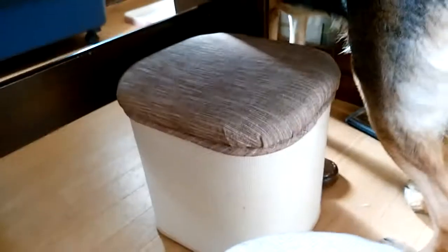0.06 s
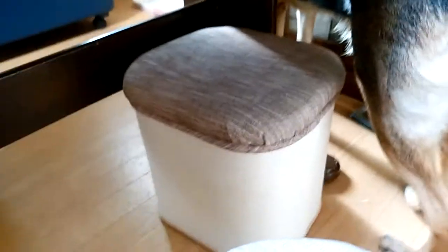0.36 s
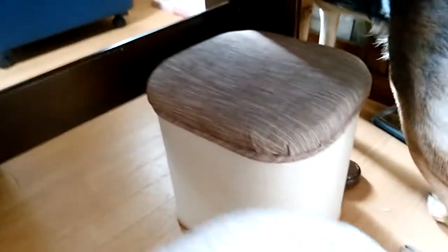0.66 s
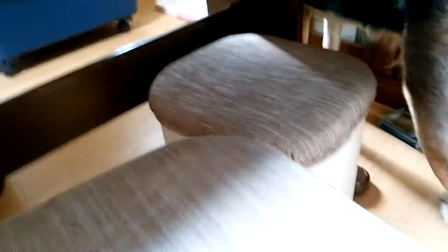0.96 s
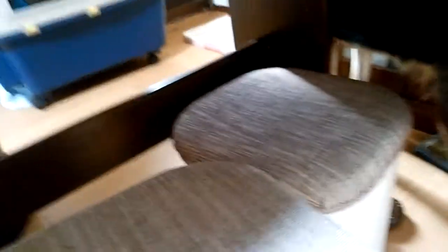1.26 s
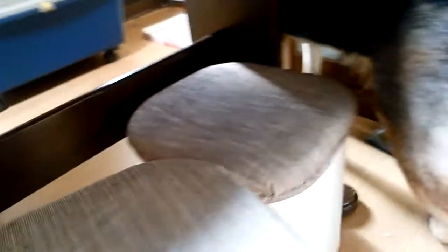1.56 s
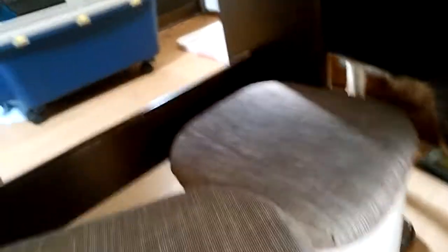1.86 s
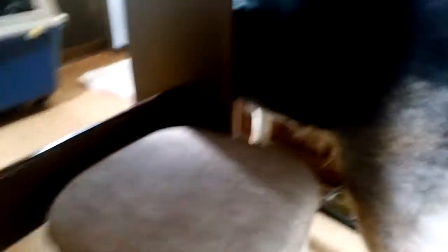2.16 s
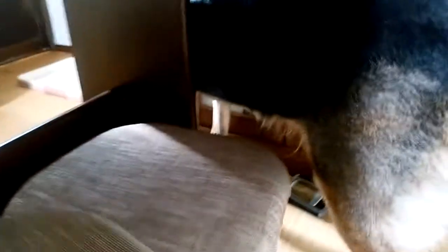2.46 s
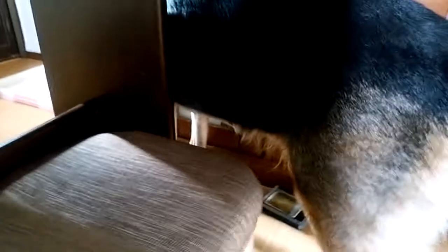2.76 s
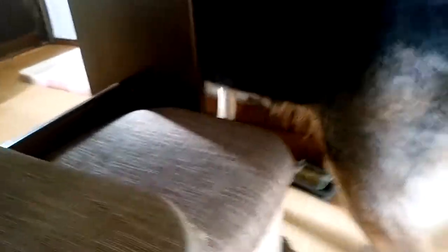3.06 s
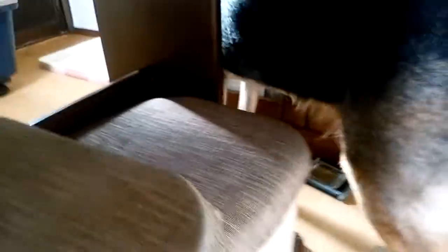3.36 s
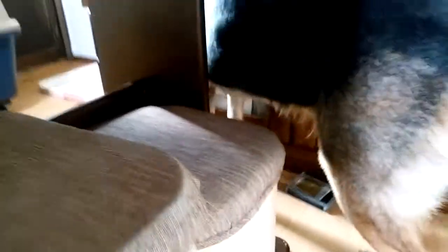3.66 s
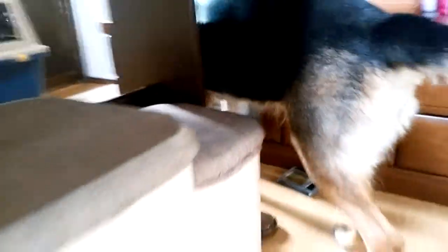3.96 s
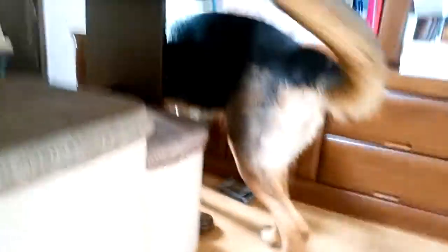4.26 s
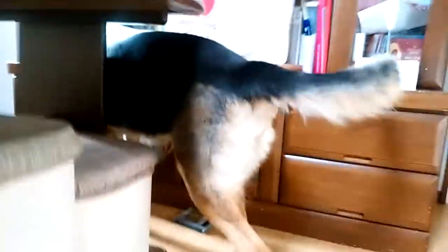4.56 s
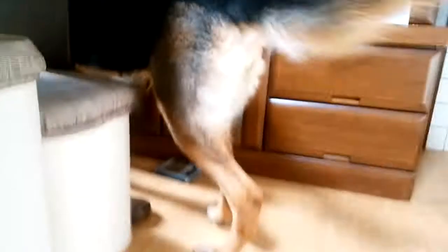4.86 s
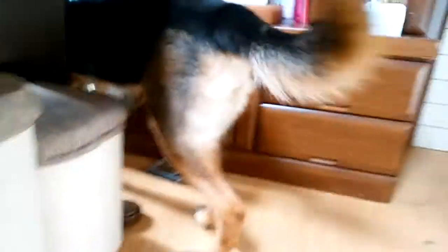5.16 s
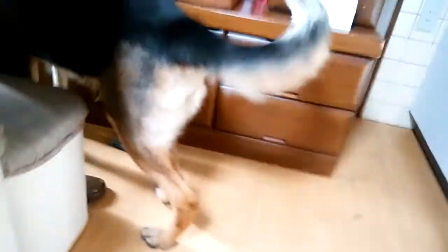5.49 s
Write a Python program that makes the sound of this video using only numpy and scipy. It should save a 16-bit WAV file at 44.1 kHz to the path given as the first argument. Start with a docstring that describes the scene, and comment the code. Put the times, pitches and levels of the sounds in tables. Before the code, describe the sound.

A large dog shifts about on a wooden floor in a small room, close to a hand-held microphone. Its claws click irregularly over soft paw thumps, short scuffs and the brushing of fur and fabric. The steps grow busier and heavier in the middle, with a few sharp ticks. Then the microphone takes a quick cluster of low bumps, and the movement thins to faint swishes and a last few clicks over quiet room air.

```python
"""A large dog shifts about on a wooden floor in a small room, close to a hand-held camera.
Its hard claws click in brief impacts, while its soft pads excite the low modes of the boards.
Sliding friction makes the paws scuff and, between steps, fur and fabric brush and swish.
Tiny ticks sound close by. The camera rumbles softly in the hand and is bumped a few times,
its case conducting the vibration to the microphone. Quiet air and a faint whine lie beneath."""
import sys
import numpy as np
from scipy import signal
from scipy.io import wavfile
from scipy.ndimage import uniform_filter1d

SR = 44100
rng = np.random.default_rng(int(sys.argv[2]) if len(sys.argv) > 2 else 0)


def materialize(psi):
    """Save the field psi as 16-bit PCM at rate SR to the path in sys.argv[1].

    A 1-D psi becomes a single channel; in a 2-D psi each row is a channel.
    """
    bounded = np.clip(np.atleast_2d(psi).T, -1, 1)
    quanta = np.round(bounded * 32767).astype(np.int16)
    wavfile.write(sys.argv[1], SR, quanta)


N = 252546
TIME = np.arange(N) / SR
BAND_LIMIT_HZ = 16200

# Reverberation of the room. Each row: frequency in Hz, 60 dB decay time in seconds.
ROOM_DECAY = [(100, 0.21), (500, 0.2), (2000, 0.34), (5000, 0.25), (9000, 0.32), (15000, 0.22)]
# Partials of the whine. Each row: frequency in Hz, rms level in dB.
WHINE_PARTIALS = [(6604, -89), (14716, -96)]
# Spectra of the noise sources. Each row: frequency in Hz, relative spectral density in dB.
AIR_SPECTRUM = [(25, -43), (65, 8), (200, -7), (600, -12), (1500, -18), (4000, -25), (7000, -27),
                (10000, -34), (16000, -35)]
RUMBLE_SPECTRUM = [(15, -61), (30, -22), (48, 5), (64, 3.5), (90, -5), (140, -12), (250, -24.5), (600, -61)]
RUB_SPECTRUM = [(70, -10.5), (150, -3), (260, 3.5), (550, -3.5), (900, -8), (1400, -14), (2500, -19.5),
                (5000, -49.5)]
HISS_SPECTRUM = [(700, -36), (1500, -2), (2800, 4), (4400, 0.5), (5500, 2.5), (6900, 4), (8200, -4),
                 (10000, -30), (14000, -71)]
FIZZ_SPECTRUM = [(6000, -40), (9000, -1.5), (11500, -4), (13500, 1), (15000, 3), (16500, -4.5)]
CLAW_SPECTRUM = [(100, 7), (280, 8), (600, 9), (1000, 4.5), (1600, 6), (2800, 1), (3700, -0.5), (4350, 1),
                 (5200, -4), (6800, -1.5), (8500, -13), (11000, -16), (15000, -9), (16500, -6)]
SWISH_SPECTRUM = [(150, -16), (350, 0.5), (650, 2.5), (1100, -8), (1700, -14), (3000, -17), (5000, -20),
                  (7000, -2.5), (8200, -12.5), (10000, -22.5), (15000, -30.5)]
# Shifts of the grip on the camera. Each row: start in seconds, length in seconds, level in dB.
GRIP_SHIFTS = [(0.723, 0.44, -39.5), (1.615, 0.12, -37.5), (2.138, 0.89, -44.5), (2.64, 0.2, -40),
               (3.012, 0.1, -41.5), (3.937, .35, -36), (4.375, 0.57, -45), (5.15, 0.59, -47)]
# Strokes of fur and fabric, one for each shift of the body.
# Each row: start, length and rise time in seconds, then relative levels of rub, hiss and fizz in dB.
BRUSH_STROKES = [(-.05, 0.041, .03, -52.5, -60.5, -68), (0.232, 0.79, 0.067, -56.5, -60.5, -71),
                 (0.712, .47, 0.025, -44, -56, -71), (1.429, 0.31, 0.25, -48.5, -51.5, -61),
                 (1.79, .19, .05, -59, -61, -74), (1.992, .13, 0.028, -49, -55, -69),
                 (2.325, 0.049, 0.039, -51, -51, -69), (2.39, 0.37, 0.16, -44, -66, -88),
                 (2.6, 0.17, 0.046, -39.5, -46.5, -65), (2.817, 0.084, .02, -43, -58, -79),
                 (2.905, 0.077, 0.097, -42.5, -49, -67), (3.028, 0.28, 0.05, -48, -47.5, -60),
                 (3.417, 0.093, .03, -49.5, -49.5, -52), (4.164, 0.062, .012, -50, -49.5, -67),
                 (4.38, 0.99, 0.048, -63.5, -70, -83), (5.39, 0.41, 0.13, -58, -60, -65.5)]
# Modes of the floor. Each row: frequency in Hz, relative level in dB, 60 dB decay time in seconds.
FLOOR_MODES = [(55.4, -24, 0.18), (65.7, 1, 0.18), (84.76, 0.5, 0.11), (109.2, -2.5, 0.1),
               (140.4, -3.5, 0.18), (160.3, -4, 0.081), (204, -4, 0.18), (250, -2.5, 0.15),
               (275, -23, 0.19), (324, -9.5, 0.11), (384.5, -10.5, 0.091), (472.5, -9.5, 0.084),
               (559.5, -11.5, 0.082), (677, -16, 0.04), (791, -23.5, 0.19)]
# Pad landings. Each row: start in seconds, relative peak in dB, upper-mode gain in dB, decay-time factor.
PAD_LANDINGS = [(.008, -40, 12, 3.3), (0.24, -43.5, 21, 0.66), (0.371, -28.5, 4, 1.7),
                (.388, -20.5, 5.5, 0.87), (0.773, -24, 11, 1.8), (.848, -19.5, -14, 1.3),
                (1.553, -24.5, -14, 0.98), (1.722, -26, -16, 2.4), (2.026, -17, -5, 0.68),
                (2.042, -16.5, -16.5, 2.4), (2.126, -18.5, -16.5, 1.36), (2.363, -30, 8, 0.16),
                (2.453, -26.5, -5, 0.29), (2.653, -7.5, -5, 0.92), (2.668, -14, 4, 1),
                (2.682, -12, 5, 0.81), (2.753, -16, -20, 1.55), (2.824, -15.5, 2.5, 1.2),
                (2.922, -22, -16, 0.87), (2.976, -17.5, -6.5, 1.54), (3.132, -31.5, 2, 1.1),
                (3.229, -28, 19, 0.32), (3.281, -16.5, 23.5, 0.5), (3.524, -18, 10.5, 1.04),
                (3.574, -34.5, -10, 0.66), (4.228, -21.5, 4, 0.57), (4.246, -15.5, -5, .27),
                (4.273, -15, -2.5, 0.46), (4.802, -34, -45, 3.1), (5.104, -30.5, -23, 1.3),
                (5.661, -33.5, -7, 0.83), (5.707, -24.5, 2, 0.19)]
# Hard ticks close by. Each row: start in seconds, peak level in dB, centre frequency in Hz.
HARD_TICKS = [(0.2212, -40.5, 10300), (1.673, -32.5, 7400), (3.1824, -18.5, 15000), (3.2804, -14, 2270),
              (4.0662, -37, 2020), (4.1729, -17, 1980), (4.8703, -28, 7100), (5.707, -23, 3040)]
# Claw impacts. Each row: start in seconds, relative level in dB, relative gains of woody body,
# clack and treble edge in dB, resonance of the nail in Hz.
CLAW_IMPACTS = [(0.2431, -35, 1.5, -15, -20, 2830), (.3257, -35, -6.5, -1, -16, 1460),
                (0.3864, -20, 7, -7, -17, 1810), (0.4587, -38.5, -10, -9, -10, 1700),
                (0.507, -34.5, -18, -9.5, -22, 2060), (0.5653, -24.5, -11.5, -15, -16, 6300),
                (0.616, -34.5, -6, -10, -22, 2170), (0.6427, -17, -23.5, -13.5, -22, 4640),
                (1.1009, -24.5, -14, -12.5, -16, 2560), (1.1687, -36, -27, -17, -9, 2790),
                (1.1981, -19, -17, -15, -17.5, 3880), (1.3544, -41.5, 5, -6, -19, 2580),
                (1.9059, -29, -19, -16.5, -21, 4930), (2.026, -25.5, 2.5, -13, -33, 2250),
                (2.0476, -31.5, -20, -5.5, -31, 3740), (2.1678, -34.5, -27, -8.5, -10, 6900),
                (2.3167, -23, -23.5, -12, -19, 6600), (2.5347, -30.5, -8.5, -17, -27, 3710),
                (2.6469, -23, -15, -12.5, -24, 2500), (2.7208, -21, -21, -11.5, -17.5, 5050),
                (2.96, -33.5, -34, -17, -26, 4340), (3.049, -32.5, -12, -6, -23, 4230),
                (3.0874, -21.5, -9.5, -7.5, -16, 3440), (3.1298, -30, -16, -8, -20, 2800),
                (3.182, -25, -19, -10, -7, 4370), (3.2288, -22, -3.5, -9, -30, 1740),
                (3.2793, -16, -16, -27.5, -22.5, 1530), (3.5115, -19, -13, -20, -22, 6450),
                (3.5189, -19, -16, -7.5, -36, 4270), (3.5496, -20.5, -7.5, -8.5, -29, 3370),
                (3.7868, -46.5, -35, -49, -17, 6800), (3.8329, -41, -35, -20.5, -15, 5640),
                (4.0652, -25, -3.5, -2.5, -18, 1940), (4.1705, -21.5, -15, -8.5, -17, 2080),
                (4.8106, -33, -24, -9, -51, 2180), (5.5974, -26.5, -26, -7, -24, 2640),
                (5.7053, -30, -20, -4, -22, 3500)]
# Paw slides. Each row: midpoint in seconds, level in dB, length in seconds, centre frequency in Hz.
PAW_SLIDES = [(.552, -50, .018, 5500), (0.692, -45.5, .033, 4500), (0.789, -44, 0.11, 2030),
              (0.978, -48, 0.079, 2930), (1.197, -50.5, .07, 4300), (1.68, -47, 0.16, 5570),
              (1.945, -51.5, 0.077, 5000), (2.12, -50.5, 0.031, 1760), (2.613, -49.5, 0.15, 690),
              (2.794, -45.5, 0.06, 3440), (2.872, -45, 0.037, 1860), (2.996, -45.5, 0.047, 3960),
              (3.464, -40.5, 0.039, 4950), (3.863, -61.5, .063, 6030), (4.204, -41.5, .04, 4460),
              (4.847, -54, 0.097, 3380), (5.117, -61.5, 0.34, 5350), (5.58, -50.5, 0.23, 3600)]
# Soft swishes. Each row: midpoint in seconds, level in dB, length in seconds, treble gain in dB.
SOFT_SWISHES = [(0.787, -39, 0.1, -25), (0.987, -52.5, 0.17, -2), (1.702, -44, 0.21, -10),
                (1.75, -57, 0.067, -28), (2.576, -43, 0.24, -28), (3.513, -37.5, 0.021, 8),
                (4.04, -39, 0.047, -4), (4.11, -38.5, 0.039, -5.5), (4.514, -50, 0.096, -7.5),
                (4.63, -47, 0.056, -8.5), (4.718, -50, 0.057, -9), (4.905, -51, 0.067, -4),
                (5.103, -45.5, 0.035, -7), (5.22, -45.5, 0.045, -11), (5.397, -47.5, 0.064, -7)]
# Bumps on the camera. Each row: start in seconds, peak of the push in dB, contact time in seconds,
# then rebound and rocking in dB relative to the push.
CASE_BUMPS = [(2.8243, -20, .0003, -21, -25), (4.0111, -7.5, 0.00052, -0.5, 2.5),
              (4.074, -13.5, 0.0024, 4.5, 5), (4.138, -21, .012, -8, 9.5), (4.2191, -7, 0.00023, -26, -10)]


def amp(db):
    """Amplitude grows tenfold for every 20 dB."""
    return 10 ** (np.asarray(db) / 20)


def unit(x):
    """Normalisation sets the rms to 1."""
    return x / np.sqrt(np.mean(x ** 2) + 1e-20)


def curve_at(points, hz):
    """Interpolation follows a curve along a logarithmic frequency axis."""
    f, value = np.transpose(points)
    return np.interp(np.log(hz + 1), np.log(f + 1), value)


def add(mix, start, sound):
    """Superposition: a sound adds to the mix from its start in seconds."""
    part = mix[max(round(start * SR), 0):][:len(sound)]
    part += sound[:len(part)]


def butterworth(x, order, hz, kind):
    """A Butterworth filter has a maximally flat passband."""
    return signal.sosfilt(signal.butter(order, hz, kind, fs=SR, output="sos"), x)


def colour(x, spectrum):
    """A minimum-phase filter takes its phase from the Hilbert transform of its log gain."""
    log_gain = np.log(amp(curve_at(spectrum, abs(np.fft.fftfreq(N if x is None else len(x), 1 / SR)))))
    return np.fft.ifft(np.fft.fft(x) * np.exp(np.conj(signal.hilbert(log_gain)))).real


def swell(start, length, rise_s, release_s):
    """The envelope of friction follows the motion, which gathers speed, holds and comes to rest."""
    t = TIME - start
    rise = np.sin(np.pi / 2 * np.clip(t / rise_s, 0, 1)) ** 2
    return rise * np.exp(-(np.maximum(t - length, 0) / release_s) ** 2)


def bell(middle, length):
    """A Gaussian envelope spans the given length between its 1/e points."""
    return np.exp(-(2 * (TIME - middle) / length) ** 2)


def diffuse_tail(t, rise_s):
    """A diffuse field builds up, then decays exponentially at a rate that depends on frequency."""
    hz, frame_s, bands = signal.stft(rng.standard_normal(len(t)), SR, nperseg=256)
    decay = amp(-60 * frame_s / curve_at(ROOM_DECAY, hz)[:, None])
    return signal.istft(bands * decay, SR, nperseg=256)[1][:len(t)] * np.minimum(t / rise_s, 1)


def room(x, early_db, early_s, tail_db):
    """Convolution adds early reflections from the furniture and the room's reverberant tail."""
    t = TIME[:SR // 2]
    early = rng.standard_normal(len(t)) * np.exp(-t / early_s) * (t > .001)
    tail = diffuse_tail(t, rise_s=0.042)
    echo = amp(early_db) * early / np.linalg.norm(early) + amp(tail_db) * tail / np.linalg.norm(tail)
    return x + signal.fftconvolve(x, echo)[:len(x)]


def burst(length_s, early_db, early_s, tail_db):
    """A brief contact radiates broadband noise, followed by early scatter and reverberation."""
    t = TIME[:SR // 2]
    envelope = np.exp(-(t / length_s) ** 2) + amp(early_db) * np.exp(-t / early_s)
    tail = diffuse_tail(t, rise_s=0.0052)
    return envelope * rng.standard_normal(len(t)) + amp(tail_db) * tail


def friction(spectrum, slips_per_s, spread_db, smooth_db):
    """Stick-slip friction: tiny uneven slips each give a puff of a few ms over a smooth hiss."""
    slips = (rng.random(N) < slips_per_s / SR) * amp(spread_db * np.minimum(rng.exponential(1, N), 4))
    power = signal.lfilter([1], [1, -np.exp(-1 / (0.0039 * SR))], slips ** 2)
    grains = unit(np.sqrt(power) * rng.standard_normal(N))
    direct = colour(grains + amp(smooth_db) * rng.standard_normal(N), spectrum)
    echo = room(direct, early_db=-2, early_s=.009, tail_db=-10) - direct
    return unit(direct + butterworth(echo, 1, 2000, "low"))  # wood gives back mostly the lows


def ambience(air_db=-60, waver_hz=6):
    """Random frequency modulation makes a faint whine waver over the broadband noise of room air."""
    drift = waver_hz * unit(uniform_filter1d(rng.standard_normal(N), size=2000))
    whine = sum(amp(db) * np.sqrt(2) * np.sin(2 * np.pi * np.cumsum(hz + drift) / SR)
                for hz, db in WHINE_PARTIALS)
    return amp(air_db) * unit(colour(rng.standard_normal(N), AIR_SPECTRUM)) + whine


def hand_rumble(rest_db=-67):
    """Structure-borne noise from the hand on the camera swells whenever the grip shifts."""
    shifts = sum(amp(db) * swell(start, length, rise_s=0.053, release_s=0.088)
                 for start, length, db in GRIP_SHIFTS)
    return (amp(rest_db) + shifts) * unit(colour(rng.standard_normal(N), RUMBLE_SPECTRUM))


def brushing(rub_gain_db=1, grazes_per_s=14, graze_db=-10, graze_spread_db=3):
    """Friction of fur and fabric gives a dull rub, a hiss and a fizz; nails graze the floor at random."""
    power = sum((amp(levels)[:, None] * swell(start, length, rise, release_s=0.073)) ** 2
                for start, length, rise, *levels in BRUSH_STROKES)  # incoherent strokes add in power
    rub_envelope, hiss_envelope, fizz_envelope = np.sqrt(power)
    touches = (rng.random(N) < grazes_per_s / SR) * amp(graze_spread_db * rng.standard_normal(N))
    graze = colour(burst(0.0016, early_db=0, early_s=0.025, tail_db=-5),
                   [(500, -16), (2500, -6), (7000, -2), (9000, -14.5), (16000, -14)])
    grazes = amp(graze_db) * unit(signal.fftconvolve(touches, graze)[:N])
    rub = amp(rub_gain_db) * friction(RUB_SPECTRUM, slips_per_s=500, spread_db=4.5, smooth_db=-3.5)
    hiss = friction(HISS_SPECTRUM, slips_per_s=700, spread_db=6.5, smooth_db=-1.5)
    fizz = friction(FIZZ_SPECTRUM, slips_per_s=490, spread_db=1.5, smooth_db=-6)
    return rub_envelope * rub + hiss_envelope * (hiss + grazes) + fizz_envelope * fizz


def pad_thumps(gain_db=-1, spot_db=2, knock_hz=170, rise_s=0.0039, slap_db=-19):
    """A soft paw excites the floor's damped modes; hard landings add upper modes and a dull slap."""
    out, t = np.zeros(N), TIME[:SR // 2]
    hz, mode_db, t60 = np.transpose(FLOOR_MODES)[:, :, None]
    upper_share = 1 / (1 + (knock_hz / hz) ** 4)
    for start, db, knock_db, decay_factor in PAD_LANDINGS:
        strength, detune, side = rng.standard_normal((3, len(hz), 1))
        sign = np.where(hz > knock_hz / 2, np.sign(side), 1)  # upper modes change sign from spot to spot
        decay_db = 60 * t / (t60 * max(decay_factor, .2))
        envelopes = amp(mode_db + knock_db * upper_share + spot_db * strength - decay_db)
        modes = sign * envelopes * np.sin(2 * np.pi * hz * (1 + 0.0436 * detune) * t)
        boards = modes.sum(0) * (1 - np.exp(-t / rise_s))
        thump = room(boards, early_db=-5.5, early_s=0.0069, tail_db=-8)
        slap = colour(burst(0.0031, early_db=1, early_s=0.0079, tail_db=-5.5),
                      [(100, -23.5), (280, 4.5), (700, 0.5), (1400, 1), (4000, -26.5), (12000, -79)])
        landing = thump / abs(thump).max() + amp(slap_db + knock_db) * slap / abs(slap).max()
        add(out, start, amp(db + gain_db) * landing / abs(landing).max())
    return out


def pad_squeak(start_s=.1, length_s=0.055, hz=2800, db=-60):
    """Stick-slip oscillation of a pad on the varnish gives a faint tone of unsteady pitch."""
    out, count = np.zeros(N), round(length_s * SR)
    pitch = hz * (1 + .05 * unit(uniform_filter1d(rng.standard_normal(count), size=40)))
    tone = np.sin(2 * np.pi * np.cumsum(pitch) / SR)
    add(out, start_s, amp(db) * tone * signal.windows.tukey(count, .5))
    return out


def ticks(edge_ratio=1.35):
    """Each very short snap excites its own resonant band; at close range the direct sound dominates."""
    out = np.zeros(N)
    for start, db, hz in HARD_TICKS:
        band_hz = [hz / edge_ratio, min(hz * edge_ratio, BAND_LIMIT_HZ)]
        snap = butterworth(burst(0.0005, early_db=-39, early_s=.005, tail_db=-40), 2, band_hz, "band")
        add(out, start, amp(db) * snap / abs(snap).max())
    return out


def claw_clicks(gain_db=-2, chatter_s=0.0048, tap_height=9.9, ring_db=4, ring_octaves=0.39):
    """A nail strikes, rebounds and chatters; the resonances of nail and floor colour each impact."""
    out, hz = np.zeros(N), np.geomspace(60, 17000, num=120)
    for start, db, body_db, clack_db, edge_db, ring_hz in CLAW_IMPACTS:
        chatter = burst(chatter_s, early_db=6, early_s=0.017, tail_db=-4)
        tap_s = 0.0004 + chatter_s * np.sort(rng.random(3)) * [.2, .7, 1.1]
        chatter[(SR * tap_s).astype(int)] += tap_height * rng.choice([-1, 1], 3)
        chatter *= 1 - np.exp(-TIME[:len(chatter)] / (0.1 * chatter_s))  # the nail bites gradually
        tilt = curve_at([(600, body_db + 10), (1700, clack_db + 5), (3500, 0), (7500, 0.0015),
                         (11000, edge_db + 13)], hz)
        resonance = ring_db * np.exp(-(np.log2(hz / ring_hz) / ring_octaves) ** 2)
        click = colour(chatter, np.c_[hz, curve_at(CLAW_SPECTRUM, hz) + tilt + resonance])
        onset_rms = np.sqrt(np.mean(click[:SR // 128] ** 2))
        add(out, start, amp(db + gain_db) * click / (2 * onset_rms))
    return out


def paw_scuffs(edge_ratio=1.32):
    """Sliding friction of a paw on the varnish gives a broad band of noise that swells and fades."""
    out = np.zeros(N)
    slide = friction([(300, -4), (1500, 4), (7000, 9), (9500, -8), (16000, -16)],
                     slips_per_s=340, spread_db=3.5, smooth_db=1)
    for middle, db, length, hz in PAW_SLIDES:
        scuff = butterworth(slide, 1, [hz / edge_ratio, hz * edge_ratio], "band")
        out += amp(db) * bell(middle, length) * unit(scuff)
    return out


def swishes(treble_hz=3500):
    """Light friction, as of fur or a sleeve, swells and fades, hollow below and airy on top."""
    out = np.zeros(N)
    stroke = friction(SWISH_SPECTRUM, slips_per_s=600, spread_db=4.5, smooth_db=-6)
    treble = signal.sosfiltfilt(signal.butter(2, treble_hz, "high", fs=SR, output="sos"), stroke)
    for middle, db, length, treble_db in SOFT_SWISHES:
        out += amp(db) * bell(middle, length) * (stroke + (amp(treble_db) - 1) * treble)
    return out


def camera_bumps(spring_hz=70, rebound_s=0.00539, rock_hz=59, rock_decay_s=0.013, rock_delay_s=.0165):
    """The case conducts a push to the microphone, springs back and rocks as a damped oscillator."""
    out, t = np.zeros(N), TIME[:SR // 4]
    swing = np.sin(2 * np.pi * rock_hz * t) * np.exp(-t / rock_decay_s)
    for start, db, contact_s, rebound_db, rocking_db in CASE_BUMPS:
        progress = t / contact_s
        impact = progress * np.exp(-progress)
        lingering_force = (1 - np.exp(-progress)) * np.exp(-t / 0.0058)
        push = butterworth(impact + lingering_force, 2, spring_hz, "high")
        push = amp(db) * push / abs(push).max()
        add(out, start, -push)
        add(out, start + rebound_s, amp(rebound_db) * push)
        add(out, start + rock_delay_s, amp(db + rocking_db) * swing)
    return out


def scene():
    """All sources superpose at one microphone; the paws' sounds reflect off furniture on the way."""
    paws = room(claw_clicks() + paw_scuffs() + pad_squeak(), early_db=-14, early_s=.003, tail_db=-26)
    mix = paws + pad_thumps() + camera_bumps() + ticks() + brushing() + swishes()
    return (mix + hand_rumble() + ambience())[None]


def record(dry):
    """The microphone acts as a high-pass on the deepest bass; a steep low-pass limits the band."""
    thinned = butterworth(dry, 2, 33, "high")
    low_pass = signal.firwin(511, BAND_LIMIT_HZ, window=("kaiser", 9), fs=SR)
    return signal.oaconvolve(thinned, low_pass[None], "same")


dry = scene()
out = record(dry)
materialize(out)
```